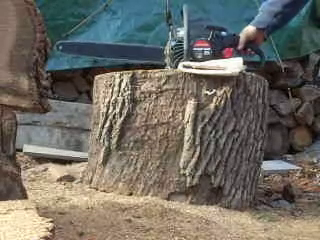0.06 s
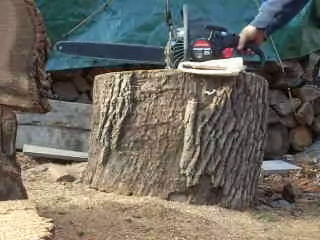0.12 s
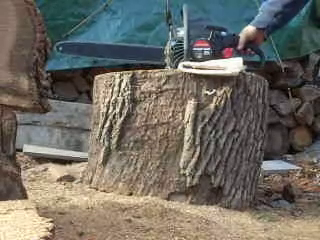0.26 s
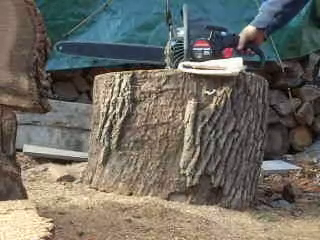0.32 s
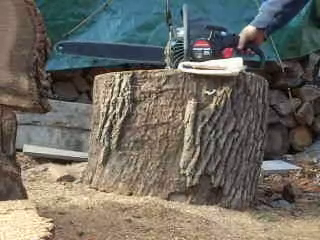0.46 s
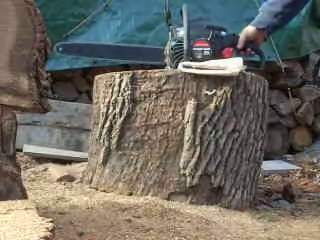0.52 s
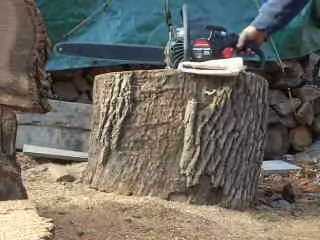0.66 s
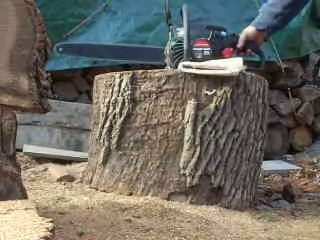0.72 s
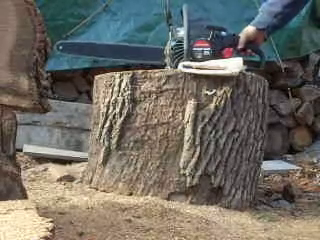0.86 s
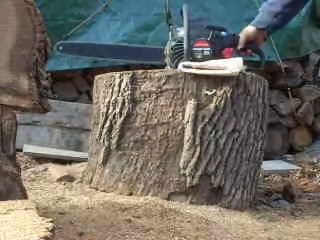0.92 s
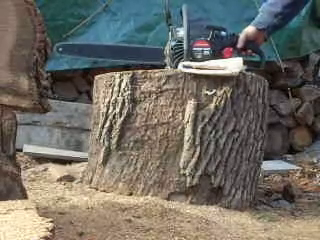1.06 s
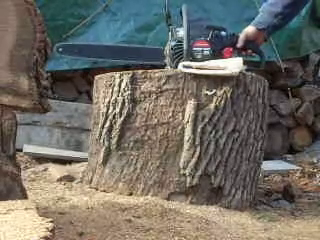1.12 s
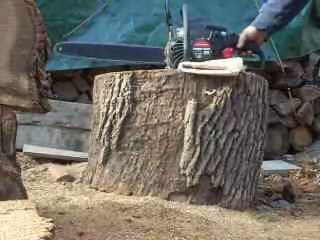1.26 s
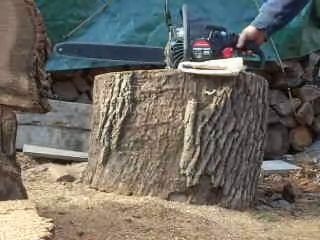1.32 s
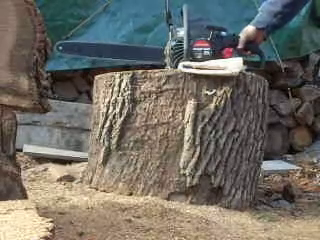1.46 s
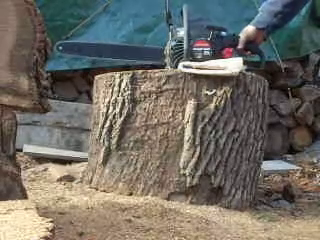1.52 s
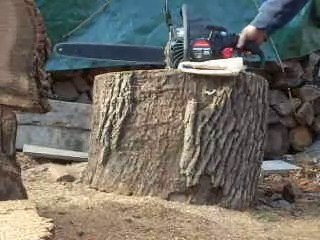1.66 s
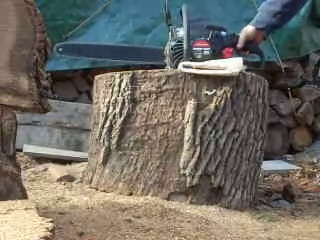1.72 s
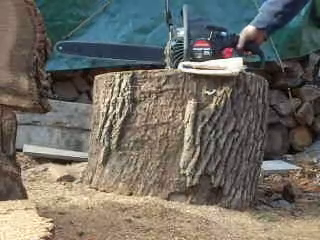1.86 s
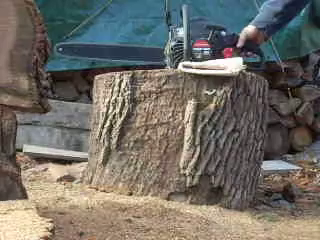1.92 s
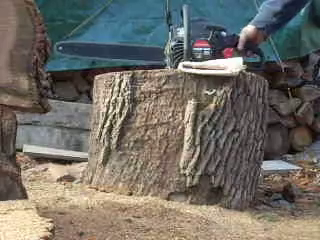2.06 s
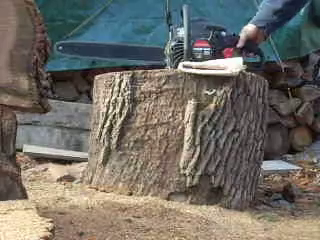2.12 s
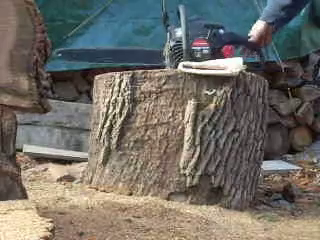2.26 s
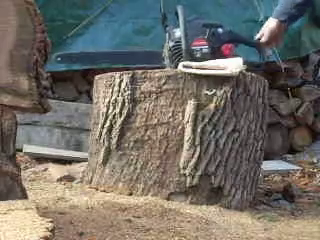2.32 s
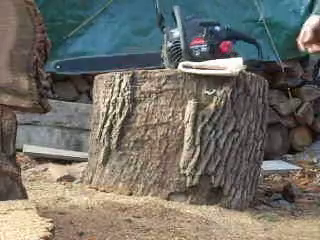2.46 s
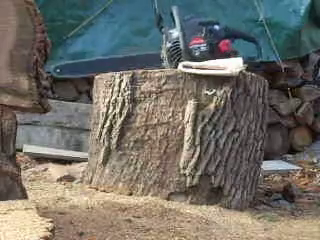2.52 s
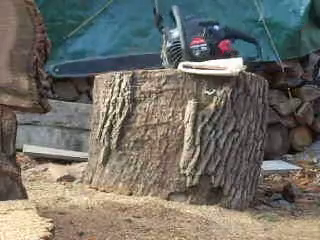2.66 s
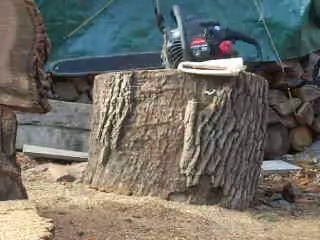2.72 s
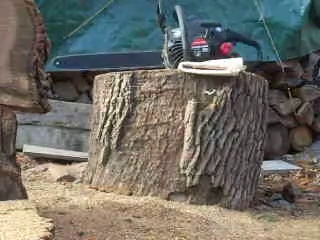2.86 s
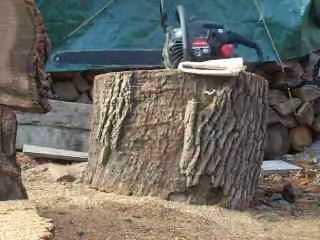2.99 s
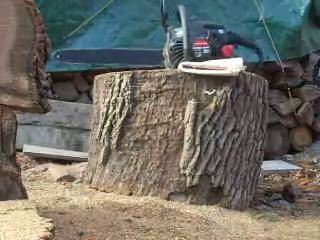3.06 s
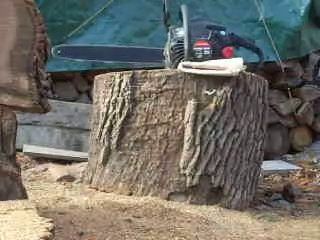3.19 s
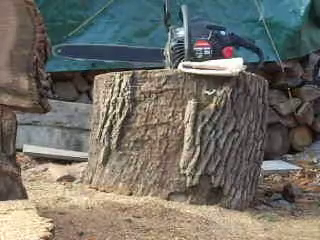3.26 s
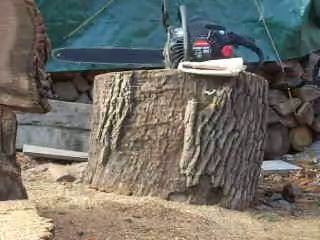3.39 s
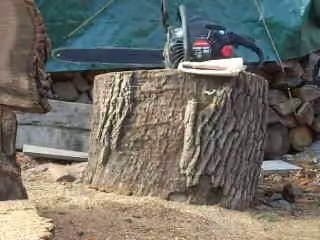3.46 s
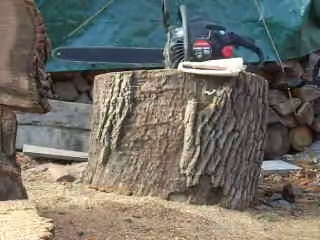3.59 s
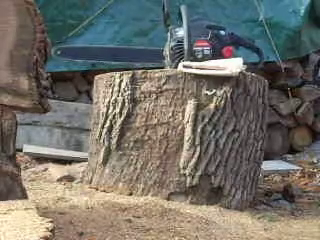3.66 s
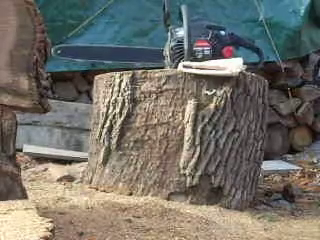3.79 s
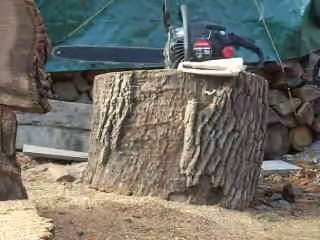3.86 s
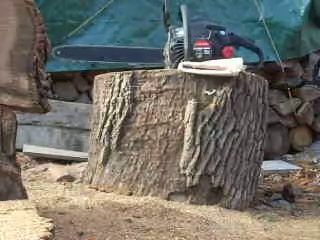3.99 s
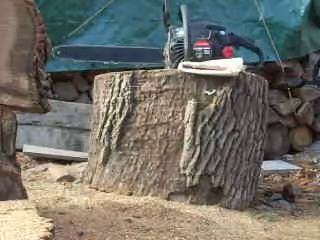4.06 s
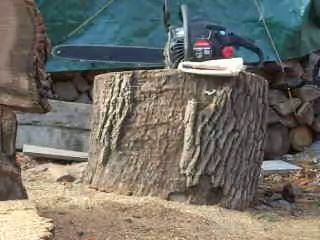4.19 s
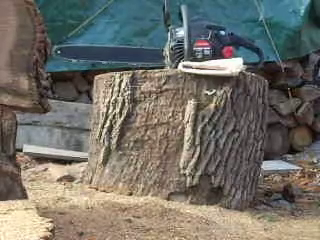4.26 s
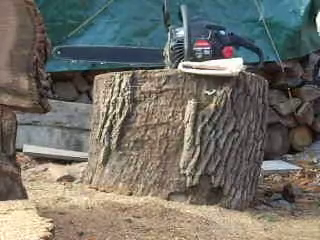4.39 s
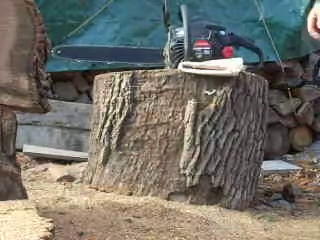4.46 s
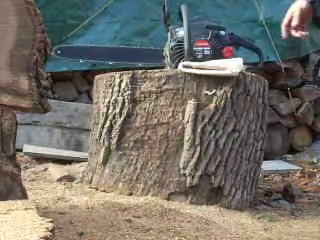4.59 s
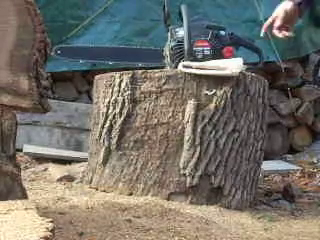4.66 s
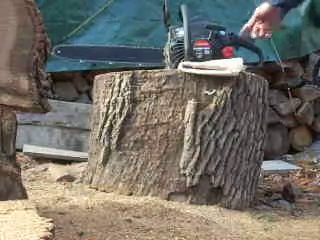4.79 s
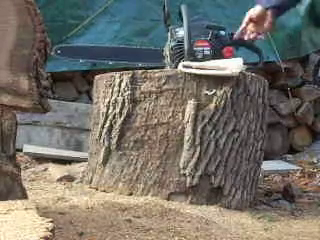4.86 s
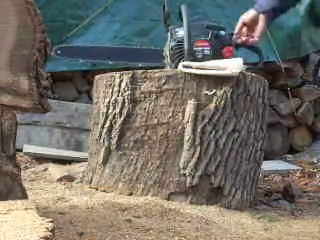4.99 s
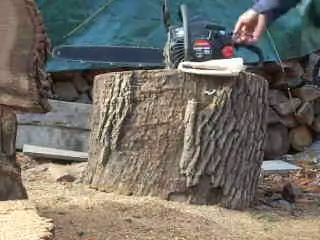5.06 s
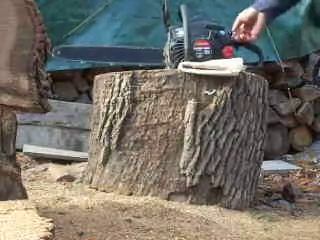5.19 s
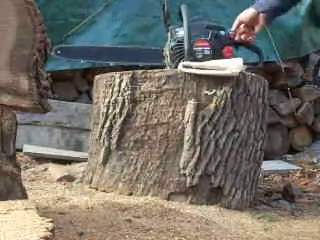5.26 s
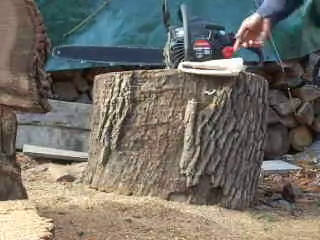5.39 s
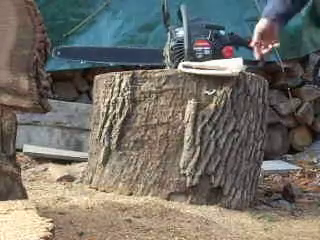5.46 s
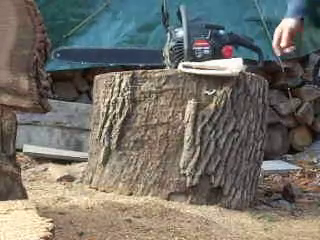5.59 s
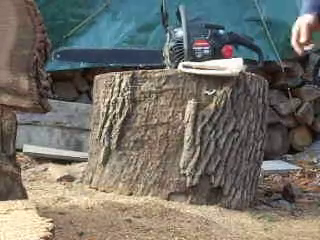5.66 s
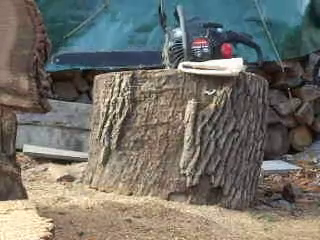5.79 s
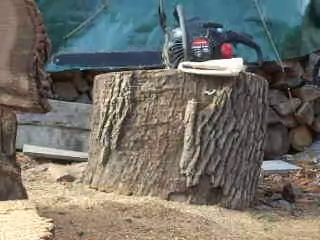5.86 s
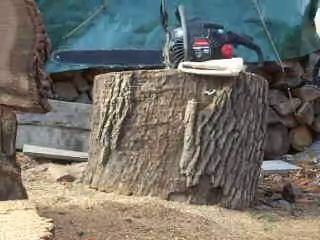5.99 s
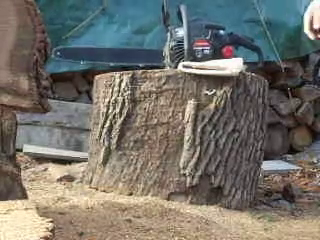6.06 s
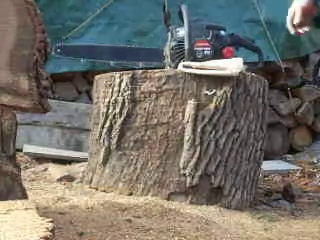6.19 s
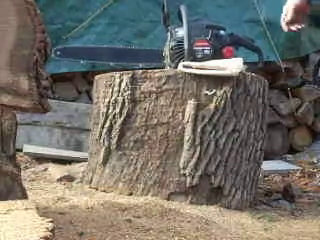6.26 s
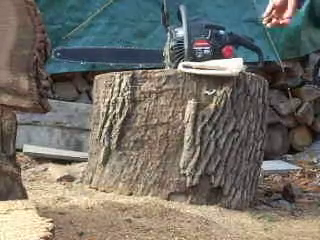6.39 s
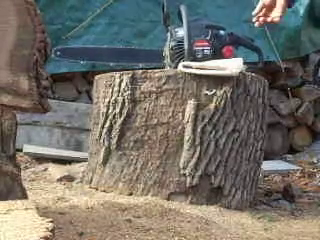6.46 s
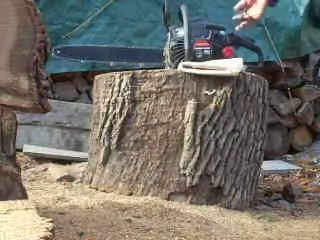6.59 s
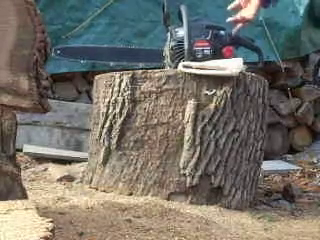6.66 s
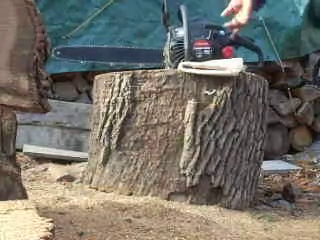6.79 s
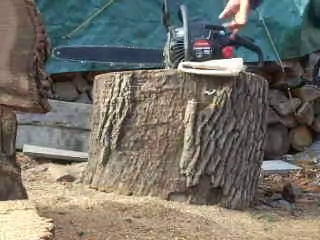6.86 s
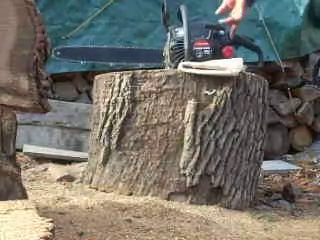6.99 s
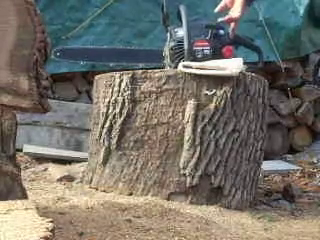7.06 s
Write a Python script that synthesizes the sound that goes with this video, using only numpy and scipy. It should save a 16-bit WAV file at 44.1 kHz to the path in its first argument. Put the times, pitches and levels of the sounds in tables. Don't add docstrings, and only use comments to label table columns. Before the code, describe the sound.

Close outdoor take of a small two-stroke chainsaw on a stump. Five short throttle blips snarl loudly and distort, then the engine coasts down to a lumpy idle with irregular pops and rattling metal. It is switched off, chuffs and scrapes to a stop, and a few hard parts click. Light wind buffets a cheap, dull camera microphone with faint buzz.

```python
import sys
import numpy as np
from scipy import signal
from scipy.fft import rfft, irfft, next_fast_len
from scipy.io import wavfile
from scipy.ndimage import map_coordinates

SR = 44100
rng = np.random.default_rng(int(sys.argv[2]) if len(sys.argv) > 2 else 0)


def master_out(mix):
    frames = np.transpose(np.atleast_2d(mix))
    ceiling = np.clip(frames, -1, 1)
    pcm = np.round(ceiling * 32767).astype(np.int16)
    wavfile.write(sys.argv[1], SR, pcm)


def magnitude_from_level(level_db):
    exponent = np.asarray(level_db, float) / 20
    return 10 ** exponent


N = 313992
T = np.arange(N) / SR

# time in seconds, speed in Hz (turns per second).
IDLE = [
    (3, 58),
    (4.7, 58.5),
    (4.95, 65.3),
]
# opening in seconds, shutting in seconds, strength in dB, top speed in Hz.
BLIPS = [
    (-.06, 0.402, -5.5, 160.7),
    (0.672, 0.936, -8, 165.3),
    (1.288, 1.52, -5.5, 161.4),
    (1.618, 1.813, -9, 161.8),
    (1.873, 2.082, -9, 170),
]
# time in seconds, peak level in dB, thump relative to the peak in dB.
POPS = [(1.1722, -14, -14), (2.2256, -19, -12), (2.3594, -39, 16), (2.4598, -24, 5), (2.5494, -14, -6),
        (2.7413, -13.5, -1), (2.8463, -27.5, -20), (3.029, -19, -2), (3.1482, -17.5, -10), (3.3484, -21, 2),
        (3.493, -22, -28), (3.6068, -21, -25), (3.6855, -18.5, -2), (3.7829, -24, 5), (3.8496, -28, 10.5),
        (3.908, -19.5, 11), (4.016, -16.5, 4), (4.128, -18, 3), (4.2401, -19, 0), (4.332, -20, -31),
        (4.3964, -19, -38), (4.4908, -21, -26), (4.5784, -21, -18), (4.645, -23.5, -7),
        (4.7265, -16.5, -13), (4.8417, -15, -7), (4.945, -23, 1), (5.0634, -25, -5), (5.1697, -30, 5),
        (5.2761, -20, -22)]
# frequency in Hz, level in dB.
CASING = [(900, -50), (1500, -26), (1850, -14), (2300, -5.5), (2600, -8.5), (2850, -8.5), (3200, -13.5),
          (3600, -9.5), (3850, -17), (4500, -19.5), (6000, -24.5)]
# frequency in Hz, level in dB.
SNAP = [(500, -35), (1500, -5.5), (2200, -3.5), (3000, -7.5), (3700, 3.5), (4300, -5), (6000, -21)]
# frequency in Hz, level in dB.
LATCH = [(300, -40), (700, -5), (1200, -3), (2000, -1), (3000, 0), (3600, -5), (4200, -14), (6000, -20)]
OFF_S, BRAKE_HZ_PER_S = 5.322, 132.9
STOP_S = OFF_S + IDLE[-1][1] / BRAKE_HZ_PER_S


def unit(x):
    return x / np.sqrt(np.mean(x ** 2) + 1e-20)


def curves(rows):
    s, *cols = np.transpose(rows)
    return [np.interp(T, s, c) for c in cols]


def law(points, x):
    return np.interp(x, *np.transpose(points))


def wobble(rate):
    return map_coordinates(rng.standard_normal(int(N * rate / SR) + 4), [T * rate])


def coloured(x, points):
    m = 2 * next_fast_len(N // 2 + 4096)
    hz, db = np.transpose(points)
    gain = magnitude_from_level(np.interp(np.log(np.fft.rfftfreq(m, 1 / SR) + 1), np.log(hz + 1), db))
    cep = irfft(np.log(gain), m)
    cep[1:m // 2] *= 2
    cep[m // 2 + 1:] = 0
    return irfft(rfft(x, m) * np.exp(rfft(cep)), m)[..., :N]


def impulses(s, size):
    at = np.clip(np.asarray(s) * SR, 0, N - 2)
    i = at.astype(int)
    return np.bincount(i, size * (1 - at + i), N) + np.bincount(i + 1, size * (at - i), N)


def swell(s, db, attack, t60):
    t = T[:SR // 4]
    shape = (1 - np.exp(-t / attack)) * magnitude_from_level(-60 * t / t60)
    return signal.fftconvolve(impulses(s, magnitude_from_level(db)), shape)[:N]


def noise(points):
    return unit(coloured(rng.standard_normal(N), points))


def crank():
    lag_s, climb_power = .025, .78
    coast_s, coast_hz = .86, 31
    catch = 10
    idle, = curves(IDLE)
    speed = np.full(N, 94.0)
    for a, b, _, top in BLIPS:
        low = np.interp(a + lag_s, T, speed)
        climb = low + (top - low) * np.clip((T - a - lag_s) / (b - a), 0, 1) ** climb_power
        coast = coast_hz + (top - coast_hz) * np.exp(-np.maximum(T - b - lag_s, 0) / coast_s)
        coast = (coast ** catch + idle ** catch) ** (1 / catch)
        speed = np.where(T < a + lag_s, speed, np.where(T < b + lag_s, climb, coast))
    return np.where(T < OFF_S, speed, np.maximum(IDLE[-1][1] - BRAKE_HZ_PER_S * (T - OFF_S), .01))


def exhaust(s, chance, steady, speed):
    # frequency in Hz, level in dB.
    open_tone = [(60, -40), (100, -9), (150, -6), (240, -3), (310, 0), (365, -2), (410, -12), (470, -13),
                 (540, -5), (600, -1), (800, 0), (880, -4), (960, -14), (1270, -5), (4000, -32)]
    # frequency in Hz, level in dB.
    shut_tone = [(60, -30), (120, -8), (160, -9), (290, -12), (430, -24), (540, -17), (620, -5), (720, -4),
                 (820, 0), (890, -4), (1000, -13), (1280, -3), (1550, -5), (1800, -11), (4500, -28)]
    # speed in Hz, level in dB.
    port_law = [(52, -60), (58, -37), (67, -32), (80, -24.5), (105, -20), (165, -12)]
    throttle = np.zeros(N)
    for a, b, db, _ in BLIPS:
        opening = np.clip((T - a) / .055, 0, 1)
        closing = np.clip((b - T) / .012 + 1, 0, 1)
        throttle += magnitude_from_level(db) * opening * closing
    throttle = throttle * (speed / 150) ** 0.59
    fired = unit(coloured(impulses(s, magnitude_from_level(1.7 * chance[:, 1])), open_tone))
    pumped = unit(coloured(impulses(s + .003, magnitude_from_level(2.6 * chance[:, 2])), shut_tone))
    roar = magnitude_from_level(-11.5) * noise(open_tone)
    shut = 1 - .6 * throttle / throttle.max()
    return throttle * (fired + roar) + magnitude_from_level(law(port_law, steady)) * shut * pumped


def din_level(steady):
    # speed in Hz, level in dB.
    din_law = [(58, -26), (63, -25.5), (70, -20.5), (100, -16.5), (120, -12.5), (168, -3)]
    # speed in Hz, level in dB.
    dead_law = [(0, -51), (20, -43), (50, -34), (65, -29)]
    powered = law(din_law, np.interp(T - 0.011, T, steady))
    db = np.where(T < OFF_S, powered, law(dead_law, steady))
    return db - 90 * np.maximum(T - STOP_S, 0)


def din(turns, chance, speed, din_db):
    # frequency in Hz, level in dB.
    case_tone = [(40, -40), (120, -7), (300, -3), (400, -5), (500, -7), (640, -6), (820, -1), (920, -4),
                 (1050, -10), (2500, -60)]
    # frequency in Hz, level in dB.
    fin_tone = [(400, -50), (800, -12), (1000, -3), (1350, 0), (1600, -3), (1800, -9), (2500, -50)]
    turn = np.minimum(turns.astype(int), len(chance) - 1)
    size = magnitude_from_level(0.47 * chance[turn, 2])
    depth = np.interp(speed, [62, 110], [.32, .22])
    throb = size * (1 + depth * np.cos(2 * np.pi * turns)) * magnitude_from_level(din_db)
    case_db = np.interp(speed, [45, 62, 120], [-8, -3.5, -17])
    casing = magnitude_from_level(0.96 * wobble(25)) * noise(CASING)
    case = magnitude_from_level(case_db + 1.5 * wobble(24)) * noise(case_tone)
    fins = magnitude_from_level(np.interp(speed, [70, 130], [-8, -10.5])) * noise(fin_tone)
    return throb * (casing + case + fins)


def piston_slap(s, chance, steady, din_db):
    slow = np.clip((90 - steady) / 20, 0, 1) * (T < OFF_S)
    knocks = swell(s, -4.5 + 7.5 * chance[:, 1], attack=.0004, t60=0.024)
    return slow * magnitude_from_level(din_db) * knocks * noise(SNAP)


def engine():
    steady = crank()
    kick = swell(np.transpose(POPS)[0], 15, attack=.004, t60=.4)
    speed = steady + (58 / np.maximum(steady, 58)) ** 3 * kick
    turns = np.cumsum(speed * (1 + .006 * wobble(14))) / SR
    whole = np.arange(1, int(turns[-1]))
    chance = rng.standard_normal((2000, 3))[:len(whole)]
    s = np.interp(whole + .008 * chance[:, 0], turns, T)
    din_db = din_level(steady)
    sound = exhaust(s, chance, steady, speed) + din(turns, chance, speed, din_db)
    return sound + piston_slap(s, chance, steady, din_db)


def wind():
    # time in seconds, level in dB.
    strength = [(0, -35), (1.8, -34), (2, -36.5), (2.3, -30), (3.1, -33.5), (3.3, -25.5), (3.55, -31.5),
                (3.7, -25), (3.95, -18.5), (4.2, -26), (4.55, -27), (4.8, -34.5), (4.95, -34.5), (5.4, -48),
                (5.8, -47), (6, -60)]
    # frequency in Hz, level in dB.
    gust = [(10, -21.5), (30, 3.5), (80, -0.5), (160, -9.5), (350, -21.5), (900, -55), (3000, -110)]
    buffet_db, = curves(strength)
    lumps = magnitude_from_level(3 * wobble(30))
    return magnitude_from_level(buffet_db) * (T < strength[-1][0]) * unit(lumps * noise(gust))


def buzz():
    frame_hz, first_s = 29.95, .0271
    s = first_s + np.arange(int(N / SR * frame_hz)) / frame_hz
    size = magnitude_from_level(3.2 * rng.standard_normal((len(s), 2)))
    train = impulses(s, size[:, 0]) - impulses(s + .57 / frame_hz, 1.1 * size[:, 1])
    t = T[:SR // 20]
    spike = t / 0.00029 * np.exp(1 - t / 0.00057) - 0.076 * np.exp(-t / .012)
    return magnitude_from_level(-36.5) * signal.fftconvolve(train, spike)[:N]


def pops():
    # frequency in Hz, level in dB.
    thump_tone = [(40, -44.5), (100, 7.5), (200, -5), (350, -6.5), (500, -5), (800, -13), (1300, -20),
                  (2000, -14), (4000, -66.5)]
    s, db, thump_db = np.transpose(POPS)
    bright_db = db - 16 * (s < 2.65)
    crack = swell(s, bright_db + 1.5, attack=.0003, t60=0.076) * noise(CASING)
    snap = swell(s, bright_db + 1.0, attack=.0002, t60=.022) * noise(SNAP)
    thump = swell(s, db + thump_db, attack=0.011, t60=0.081) * noise(thump_tone)
    return crack + snap + thump


def drum():
    # time in seconds, frequency in Hz, level in dB.
    whine = [
        (3.2, 1290, -50),
        (3.3, 1160, -31.5),
        (3.45, 960, -30.5),
        (3.63, 760, -33.5),
        (3.72, 670, -55),
    ]
    hz, db = curves(whine)
    turning = (T > whine[0][0]) & (T < whine[-1][0])
    phase = 2 * np.pi * np.cumsum(hz * (1 + 0.006 * wobble(60))) / SR
    return magnitude_from_level(db) * turning * np.sin(phase)


def rundown():
    # frequency in Hz, level in dB.
    puff_tone = [(60, -30), (150, -1), (280, 0), (400, -6), (700, -24), (1500, -40), (4000, -60)]
    strokes = 16
    stroke, hz = np.arange(strokes), IDLE[-1][1]

    def when(turns):
        return OFF_S + (hz - np.sqrt(hz ** 2 - 2 * BRAKE_HZ_PER_S * turns)) / BRAKE_HZ_PER_S

    scrape_db = -19.5 - .35 * stroke + 1.5 * rng.standard_normal(strokes)
    scrape_db[-1] += -9
    scrape_s = when(stroke - .35)[1:]
    scrape = swell(scrape_s, scrape_db[1:], attack=.0015, t60=.07) * noise(LATCH)
    puff_db = np.minimum(-25 + .5 * stroke, -22.5)
    puff = 85 * coloured(impulses(when(stroke) - .001, magnitude_from_level(puff_db)), puff_tone)
    return scrape - puff


def clicks():
    # time in seconds, peak level in dB, pitch in Hz, 60 dB decay time in seconds.
    contacts = [
        (5.7226, -12, 2940, 0.034),
        (5.8013, -14, 1924, 0.033),
        (5.8503, -35, 2700, 0.048),
        (5.8778, -40, 2780, 0.04),
        (5.904, -30, 2840, 0.1),
        (5.9439, -19.5, 2090, 0.023),
        (5.9878, -42, 2070, 0.04),
        (6.0426, -35.5, 2830, 0.033),
        (6.0821, -40, 2670, 0.04),
        (6.1704, -56, 1920, 0.026),
    ]
    crack, ring, t = np.zeros(N + SR), np.zeros(N + SR), T[:SR // 8]
    for s, db, hz, t60 in contacts:
        fall = magnitude_from_level(db - 60 * t / abs(t60)) * (1 - np.exp(-t / .0006))
        crack[round(s * SR):][:len(t)] += fall
        ring[round(s * SR):][:len(t)] += fall * np.sin(2 * np.pi * hz * t)
    return 0.81 * crack[:N] * noise(LATCH) + 0.33 * ring[:N]


def scene():
    saw = engine() + pops() + rundown() + clicks() + drum()
    t = T[:SR // 8]
    answer = np.clip(t / 0.006, 0, 1) * magnitude_from_level(-60 * t / 0.13) * rng.standard_normal(len(t))
    answer = magnitude_from_level(-17) * signal.fftconvolve(saw, answer / np.linalg.norm(answer))[:N]
    return (saw + answer + wind())[None]


def low_pass(x):
    return signal.sosfilt(signal.butter(12, 15930, fs=SR, output="sos"), x)


def record(dry):
    # frequency in Hz, level in dB.
    hiss = [(15, -30.5), (25, 2.5), (123, -11.5), (420, -16), (994, -18), (1460, -23), (2020, -25.5),
            (3700, -33), (4300, -49.5), (5590, -69), (9460, -120)]
    # frequency in Hz, level in dB.
    mic = [(20, -2.5), (3900, -3.5), (4150, -7.5), (4450, -24.5), (4700, -63), (5200, -100)]
    x = dry / (1 + np.abs(dry / 1.25) ** 4) ** (1 / 4)
    x = coloured(x + magnitude_from_level(-43) * noise(hiss) + buzz(), mic)
    x = x / (1 + np.abs(x / .73) ** 22) ** (1 / 22)
    x = irfft(rfft(x) * (np.fft.rfftfreq(N, 1 / SR) < 15935), N)
    return low_pass(x)


dry = scene()
out = record(dry)
master_out(out)
```